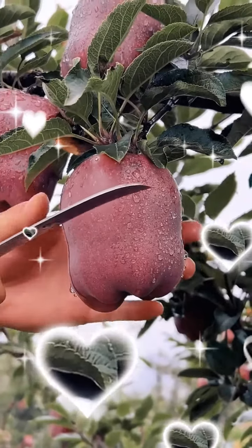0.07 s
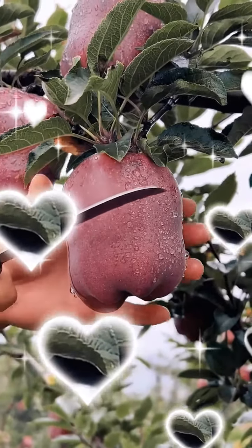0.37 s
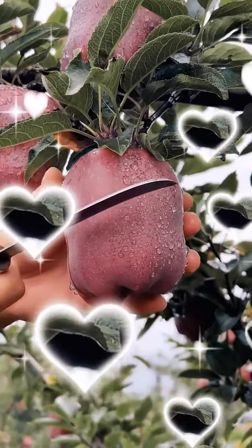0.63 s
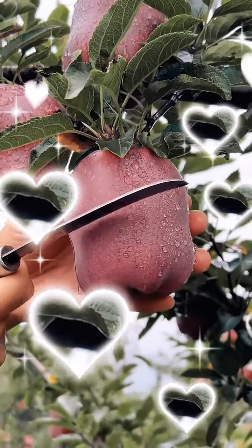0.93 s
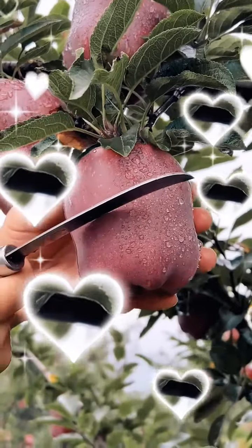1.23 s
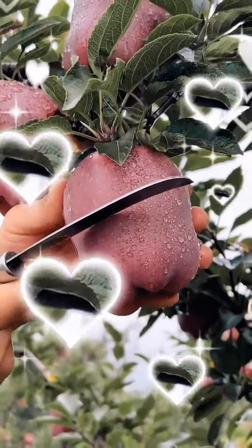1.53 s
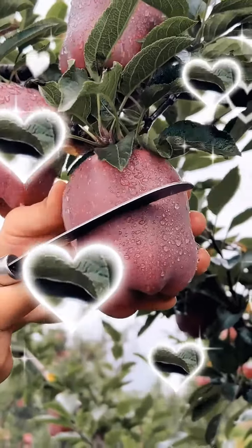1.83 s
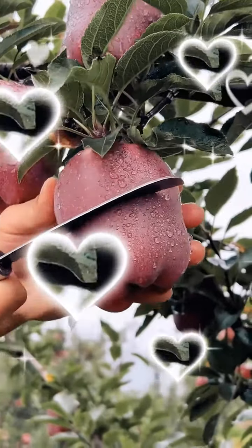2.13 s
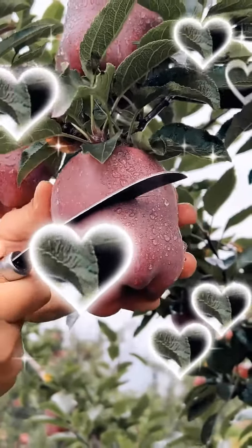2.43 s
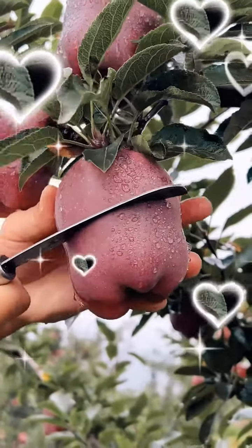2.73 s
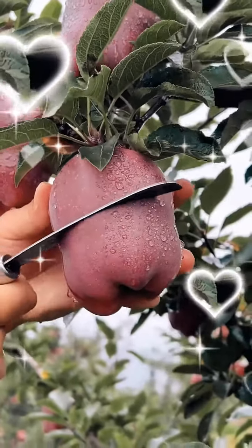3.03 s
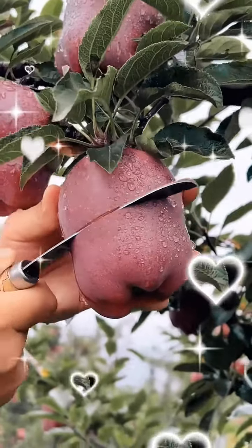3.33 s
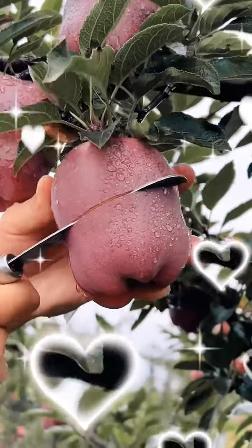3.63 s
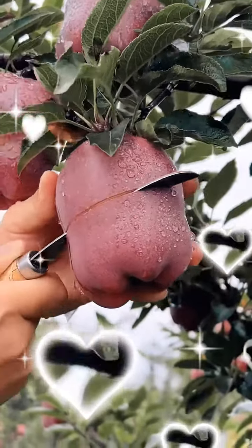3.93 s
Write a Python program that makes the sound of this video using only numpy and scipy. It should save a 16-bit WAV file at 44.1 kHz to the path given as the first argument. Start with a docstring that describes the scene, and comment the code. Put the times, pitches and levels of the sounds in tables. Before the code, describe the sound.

A knife cuts an apple close to the microphone. For the first second the skin creaks under the blade, then ticks and splits with a sharp snap at about 1.7 seconds. From 1.9 seconds to the end at 4, six sawing strokes crunch wetly through the flesh, with a couple of sharp clicks. Soft handling thumps and rumble lie underneath, with faint outdoor hiss and a distant hum.

```python
"""At an apple tree outdoors, close to a hand-held phone, a knife is pressed into a hanging apple.
The skin sticks and slips under the edge, creaking and ticking, then splits with a snap.
Six sawing strokes crunch through the flesh: cells burst, juice fizzes and the blade rings along.
Handling thumps and rumble lie underneath, with a faint far hum and outdoor hiss."""
import sys
import numpy as np
from scipy import signal
from scipy.fft import rfft, irfft
from scipy.io import wavfile
from scipy.ndimage import uniform_filter1d, map_coordinates

SR = 44100
rng = np.random.default_rng(int(sys.argv[2]) if len(sys.argv) > 2 else 0)


def transcribe(u):
    """Save the signal u as a 16-bit wav file named by the first command-line argument.

    u: samples, shape (n,) or (channels, n), limited to [-1, 1]; the rate is SR.
    q: integer samples, one column per channel.
    """
    v = np.clip(np.atleast_2d(u).T, -1, 1)
    q = np.round(v * 32767).astype(np.int16)
    wavfile.write(sys.argv[1], SR, q)


N = 176400
T = np.arange(N) / SR


def undb(db):
    """Decibels to gain."""
    return 10 ** (np.asarray(db) / 20)


def unit(x):
    """Scale to rms 1."""
    return x / np.sqrt(np.mean(x ** 2))


def envelope(points):
    """Gain over time from (time [s], level [dB]) points, silent outside them."""
    return undb(np.interp(T, *np.array(points).T, left=-150, right=-150))


def bin_gains(spectrum, size):
    """Gain per FFT bin from (frequency [Hz], level [dB]) points."""
    hz, db = np.array(spectrum).T
    return undb(np.interp(np.log(np.fft.rfftfreq(size, 1 / SR) + 1), np.log(hz), db))


def noise(spectrum):
    """Coloured noise, rms 1."""
    return unit(irfft(rfft(rng.standard_normal(N)) * bin_gains(spectrum, N), N))


def response(spectrum, size=1024):
    """Minimum-phase impulse response, unit energy."""
    cepstrum = irfft(np.log(bin_gains(spectrum, size)))
    cepstrum[1:size // 2] *= 2
    cepstrum[size // 2 + 1:] = 0
    impulse = irfft(np.exp(rfft(cepstrum)))
    return impulse / np.linalg.norm(impulse)


def through(x, impulse):
    """Convolve, keeping the length."""
    return signal.oaconvolve(x, impulse)[:len(x)]


def wander(hz):
    """Random drift slower than about hz, rms 1."""
    rolloff = 1 + (np.fft.rfftfreq(N, 1 / SR) / hz) ** 4
    return unit(irfft(rfft(rng.standard_normal(N)) / rolloff, N))


def grains(per_s, scatter_db):
    """Random impulses of scattered size, rms 1."""
    impulses = (rng.random(N) < per_s / SR) * rng.choice([-1, 1], N)
    return unit(impulses * undb(scatter_db * np.clip(rng.standard_normal(N), -2, 2)))


def add(out, x, start_s):
    """Mix x into out at start_s."""
    i = max(int(start_s * SR), 0)
    out[i:i + len(x)] += x[:max(N - i, 0)]


# far hum partials (frequency [Hz], level [dB])
HUM_PARTIALS = [(80, -67), (240, -62.5)]
# outdoor hiss (frequency [Hz], relative density [dB])
AIR_SPECTRUM = [(40, -19), (120, 19.5), (300, 1), (700, -8.5), (1350, 8), (2000, -10), (3500, -45),
                (7000, -7.5), (10000, -14), (14000, -13), (16000, -115)]


def outdoors(hiss_db=-56.5, waver_db=5.1):
    """Soft hiss and a far hum that wavers in pitch and level."""
    warped_s = np.cumsum(1 + 0.0205 * wander(hz=4.5)) / SR
    hum = sum(undb(db + waver_db * wander(hz=9.7)) * unit(np.sin(2 * np.pi * hz * warped_s))
              for hz, db in HUM_PARTIALS)
    return hum + undb(hiss_db) * noise(AIR_SPECTRUM)


# handling rumble (time [s], level [dB])
RUMBLE_LEVEL = [(0, -51.5), (.6, -47), (.9, -43.5), (1.2, -41), (1.55, -40.5), (1.7, -47.5), (1.9, -46.5),
                (2.2, -43.5), (2.33, -37.5), (2.5, -44), (3.3, -42.5), (4, -43.5)]
# handling rumble (frequency [Hz], relative density [dB])
RUMBLE_SPECTRUM = [(20, -35), (35, -6), (55, 0), (85, 9), (115, -3), (180, -4.5), (300, -12), (600, -24),
                   (1500, -32.5), (4000, -64)]
# handling thumps (time [s], level [dB], frequency [Hz], length [s])
THUMPS = [(0.439, -38, 86, 0.056), (0.821, -26, 48.6, 0.046), (0.994, -23, 52.3, 0.068),
          (1.052, -28, 60, 0.051), (1.424, -30.5, 46, 0.047), (1.494, -30.5, 65.7, 0.088),
          (3.472, -35, 50.6, 0.044), (3.63, -33, 54, 0.064), (3.97, -30, 54.3, 0.046)]


def handling():
    """Hands shift on the phone and the fruit: rumble and soft thumps."""
    out = envelope(RUMBLE_LEVEL) * noise(RUMBLE_SPECTRUM)
    for start_s, db, hz, length_s in THUMPS:
        t = T[:int(length_s * SR)]
        add(out, undb(db) * np.sin(np.pi * t / length_s) * np.sin(2 * np.pi * hz * t), start_s)
    return out


# skin slips under the blade (time [s], relative level [dB])
SLIPS = [(.008, -38), (.027, -36), (0.244, -31.5), (0.262, -33), (0.27, -32), (0.294, -38), (0.373, -37),
         (0.395, -26.5), (0.407, -34), (0.428, -29), (0.447, -34), (0.454, -33), (0.529, -37),
         (0.542, -32.5), (.556, -33.5), (0.58, -37), (.627, -39), (0.643, -32.5), (0.747, -37),
         (0.855, -36), (0.88, -28.5), (0.895, -39), (0.912, -32), (0.93, -37), (0.972, -39), (1.0, -34)]
# one slip (frequency [Hz], relative density [dB])
SLIP_SPECTRUM = [(80, -19), (200, 5.5), (430, 6.5), (750, 1), (1300, 4.5), (1600, -1), (2000, -44),
                 (3500, -43), (12000, -58)]
# fine creak between slips (time [s], level [dB])
CREAK_LEVEL = [(0, -45.5), (.08, -55), (.12, -59.5), (.25, -50.5), (.44, -49), (.5, -50.5), (.66, -49.5),
               (.8, -52), (.9, -45.5), (.99, -45), (1.09, -77), (1.7, -64)]


def creaking(slip_gain_db=12, rebound_s=0.00141, rebound_gain=0.8, spurt_db=2, size=1024):
    """The skin sticks and slips under the edge: dull downward chirps; listed slips catch twice."""
    hz = np.fft.rfftfreq(size, 1 / SR)
    delay_s = 0.00266 * np.exp(-hz / 900) + 0.000836  # lows arrive last
    phase = 2 * np.pi * np.cumsum(delay_s) * SR / size
    chirp = irfft(rfft(response(SLIP_SPECTRUM)) * np.exp(-1j * phase))
    out = np.zeros(N)
    for start_s, db in SLIPS:
        slip = rng.choice([-1, 1]) * undb(db + slip_gain_db) * chirp
        add(out, slip, start_s)
        add(out, rng.choice([-1, 1]) * rebound_gain * slip, start_s + rebound_s * (.5 + rng.random()))
    fine_slips = grains(per_s=450, scatter_db=0) * undb(spurt_db * wander(hz=24.7))
    return out + envelope(CREAK_LEVEL) * unit(through(fine_slips, chirp))


# edge on skin (time [s], level [dB])
RUB_LEVEL = [(0, -59), (.04, -51), (.09, -57.5), (1.1, -58), (1.43, -56), (1.55, -54.5), (1.69, -51.5),
             (1.8, -60.5), (2.55, -57.5), (4, -51)]
# edge on skin (frequency [Hz], relative density [dB])
RUB_SPECTRUM = [(500, -2), (1000, 5), (1450, 6.5), (1900, 5.5), (2600, -1.5), (5000, -5.5), (7000, -4),
                (9500, -15.5), (15000, -22)]


def rubbing():
    """The edge rubs on the skin: faint friction noise."""
    return envelope(RUB_LEVEL) * noise(RUB_SPECTRUM)


SPLIT_RISE_S = 0.0012


def tear(decay_s, spectrum, size=2048):
    """A brief burst of tearing fibres, unit energy."""
    t = T[:size]
    burst = rng.standard_normal(size) * np.exp(-t / decay_s) * (1 - np.exp(-t / SPLIT_RISE_S))
    burst = through(burst, response(spectrum))
    return burst / np.linalg.norm(burst)


# edge catches (time [s], relative level [dB], centre [Hz], fall-off [dB/octave], decay [s])
TICKS = [(.025, -20.5, 4860, 23, 0.02), (0.057, -26.5, 4900, 19, 0.0039), (1.412, -32, 6800, 51, 0.003),
         (1.414, -28, 1600, 30, 0.0017), (1.433, -28.5, 6800, 59, 0.0014), (1.434, -25, 1560, 30, 0.0098),
         (1.5125, -28.5, 1420, 39, 0.0011), (1.641, -14.5, 1650, 25, 0.0024),
         (2.4008, -11, 5340, 39, 0.0027), (2.577, -28.5, 5240, 16, 0.0031),
         (3.0372, -13.5, 6340, 28, 0.00086)]


def ticks():
    """The edge catches and makes small tears, each in one band."""
    out = np.zeros(N)
    for start_s, db, hz, db_per_octave, decay_s in TICKS:
        band = [(hz / 8, -3 * db_per_octave), (hz, 0), (hz * 8, -3 * db_per_octave)]
        add(out, 2 * undb(db) * tear(decay_s, band), start_s)
    return out


# skin and firm flesh splitting (time [s], relative level [dB], tilt [dB/octave], crack decay [s])
SNAPS = [(1.702, -15, -2, 0.0059), (1.7097, 5, -2, 0.0048), (1.7136, -4, 4.5, 0.002),
         (1.7181, -10.5, -1, 0.0047), (1.7286, -14, -5, 0.0062), (2.4026, -3, 1.5, 0.0017),
         (2.608, -15.5, -4, 0.006), (3.0358, -14.5, -0.5, 0.0016)]
# blade and fruit modes (frequency [Hz], relative level [dB], t60 [s])
SNAP_MODES = [(1100, -2.5, 0.0096), (1296, 10.5, 0.016), (2130, 4.5, 0.014), (3200, 0, 0.032),
              (3530, 0.5, 0.025), (4320, -2.5, 0.02), (6670, -11, 0.046)]
# skin crack (frequency [Hz], relative density [dB])
CRACK_SPECTRUM = [(150, -15), (550, -12.5), (900, 0.5), (1300, -9), (2000, -13), (5000, 0), (7500, 4.5),
                  (10000, -10), (16000, -9)]


def snaps(ring_gain, crack_db=-8.5, size=2048):
    """Each split is a tearing crack and a kick that rings blade and fruit."""
    out, t = np.zeros(N), T[:size]
    ring = sum(undb(db) * np.sin(2 * np.pi * hz * t) * np.exp(-np.log(1000) * t / t60_s)
               for hz, db, t60_s in SNAP_MODES)
    ring *= 1 - np.exp(-t / SPLIT_RISE_S)
    for start_s, db, db_per_octave, decay_s in SNAPS:
        tilt = response([(800, -db_per_octave), (6400, 2 * db_per_octave)])
        body = through(ring / np.linalg.norm(ring), tilt)
        crack = through(undb(crack_db) * tear(decay_s, CRACK_SPECTRUM), tilt)
        snap = (ring_gain * body + crack) / np.linalg.norm(body + crack)
        add(out, 2 * undb(db) * snap, start_s)
    return out


def shifting_ripple(x, hold_s=.17, decay_s=.006, ring_db=4, size=2048):
    """Fine, narrow resonances colour the crunch and keep shifting, one short ring melting into the next."""
    out, t = np.zeros(N), T[:size]
    for centre_s in np.arange(rng.random() - 1, N / SR / hold_s + 1) * hold_s:
        rings = rng.standard_normal((2, size)) * np.exp(-t / decay_s)
        rings *= undb(ring_db) / np.linalg.norm(rings, axis=1, keepdims=True)
        rings[:, 0] += 1  # direct path
        ripple = rfft(rings[0], 2 * size) * rfft(rings[1], 2 * size)  # two in series: sharper peaks
        ripple /= np.sqrt(uniform_filter1d(np.abs(ripple) ** 2, size=70))  # flatten the broad trend
        near = np.flatnonzero(np.abs(T - centre_s) < hold_s)
        if len(near):
            faded = x[near] * np.cos(np.pi / 2 * (T[near] - centre_s) / hold_s)
            add(out, signal.fftconvolve(faded, irfft(ripple)[:size]), T[near[0]])
    return unit(out)


# modes of the blade in the fruit (frequency [Hz], bandwidth [Hz], relative level [dB])
BLADE_MODES = [(1327, 233, 24), (1640, 160, 11.5), (2454, 250, -12), (3250, 380, 11), (7200, 300, -1)]
CELLS_PER_S, CELL_SCATTER_DB = 9000, 2.5


def blade_ring(low_cut_hz=930, pitch_drift=.025, throb_db=1.5, size=2048):
    """Bursting cells ring the blade; the ring throbs, and its pitch drifts as the blade slides."""
    t = T[:size]
    modes = sum(undb(db) * np.sqrt(width_hz) * np.cos(2 * np.pi * hz * t) * np.exp(-np.pi * width_hz * t)
                for hz, width_hz, db in BLADE_MODES)
    # the ring carries little bass
    modes = signal.sosfilt(signal.butter(2, low_cut_hz, "high", fs=SR, output="sos"), modes)
    ring = through(grains(CELLS_PER_S, CELL_SCATTER_DB), modes)
    read_position = np.cumsum(1 + pitch_drift * wander(hz=7.3))
    ring = map_coordinates(ring, [read_position], mode="mirror")
    return unit(ring * undb(throb_db * wander(hz=45)))


# sawing force, one list per stroke (time [s], relative level [dB])
STROKE_FORCES = [
    [(1.85, -71), (1.885, -47), (1.94, -34.5), (2.01, -42.5), (2.075, -42), (2.115, -58), (2.16, -50)],
    [(2.16, -56), (2.19, -47), (2.225, -31), (2.265, -33.5), (2.31, -37.5), (2.38, -34.5), (2.435, -32),
     (2.48, -40.5), (2.51, -55)],
    [(2.585, -56.5), (2.61, -35), (2.66, -36), (2.735, -31.5), (2.79, -35), (2.84, -36), (2.862, -63),
     (2.94, -54.5)],
    [(2.94, -64), (2.99, -46), (3.035, -36), (3.12, -37.5), (3.16, -30.5), (3.245, -33), (3.268, -48.5),
     (3.3, -83)],
    [(3.33, -82), (3.357, -33), (3.39, -30.5), (3.43, -35.5), (3.465, -29), (3.505, -29.5), (3.53, -37.5),
     (3.57, -37), (3.595, -60), (3.688, -56)],
    [(3.688, -47), (3.702, -33.5), (3.81, -31), (3.85, -35), (3.89, -29), (3.93, -27), (3.96, -44.5),
     (4.0, -44.5)],
]
# mix per stroke (blade ring [dB], juicy fizz [dB])
STROKE_MIX = [(-7, -7), (-3.5, -10), (-7, -6.5), (-4.5, -7.5), (-7, -3), (-18, -4.5)]
# bursting cells (frequency [Hz], relative density [dB])
CRUNCH_SPECTRUM = [(150, 3), (500, -13.5), (880, -15.5), (1250, 10), (2000, 3), (2800, 5), (4000, 7),
                   (5400, 3), (7200, 5.5), (9000, -1.5), (16000, -41.5)]
# juicy fizz (frequency [Hz], relative density [dB])
FIZZ_SPECTRUM = [(3000, 4.3), (7000, 18.5), (9800, 14.2), (11800, 3.5), (14500, 10), (16000, 8.8)]


def sawing(crunch_db=-3, judder_db=0.17, catch_db=-16):
    """Cells burst in a dense stream with coarser catches of the edge; the blade rings along."""
    cells = shifting_ripple(grains(CELLS_PER_S, CELL_SCATTER_DB)) * undb(judder_db * wander(hz=91))
    cells += undb(catch_db) * grains(per_s=150, scatter_db=3)
    crunch = undb(crunch_db) * unit(through(cells, response(CRUNCH_SPECTRUM)))
    fizz = unit(through(cells, response(FIZZ_SPECTRUM)))
    ring = blade_ring()
    return sum(envelope(force) * (crunch + undb(fizz_db) * fizz + undb(ring_db) * ring)
               for force, (ring_db, fizz_db) in zip(STROKE_FORCES, STROKE_MIX))


def wet_cut(x, patch_db=3):
    """The wet cut keeps changing shape: patches a few hundred hertz wide swell and fade on their own."""
    spectrogram = signal.stft(x, nperseg=512)[2]
    patches = uniform_filter1d(rng.standard_normal(spectrogram.shape), size=4, axis=0)
    patches = uniform_filter1d(patches, size=14, axis=1)
    gain = unit(undb(patch_db * np.clip(unit(patches), -3, 1.5)))
    return signal.istft(spectrogram * gain)[1][:N]


def sources(snap_ring_gain):
    """One random mono draw of all sources."""
    cutting = wet_cut(sawing() + rubbing())
    return cutting + snaps(snap_ring_gain) + ticks() + creaking() + handling() + outdoors()


# stereo width (frequency [Hz], side gain [dB])
SIDE_GAIN = [(50, -51), (110, -15), (200, -12.5), (400, -2), (800, 1), (1400, -5), (2000, -55), (4800, -56),
             (6000, -1.5), (13000, -6.5)]


def scene():
    """Centred sources; a diffuse share, without the ring of the snaps, widens a few bands."""
    mid = sources(snap_ring_gain=0.71)
    diffuse = signal.hilbert(sources(snap_ring_gain=0)).imag
    side = irfft(rfft(diffuse) * bin_gains(SIDE_GAIN, N), N)
    return np.array([mid + side, mid - side])


def record(dry, cutoff_hz=15800):
    """The phone cuts the top treble."""
    return signal.sosfilt(signal.ellip(10, .2, 80, cutoff_hz, fs=SR, output="sos"), dry)


dry = scene()
out = record(dry)
transcribe(out)
```